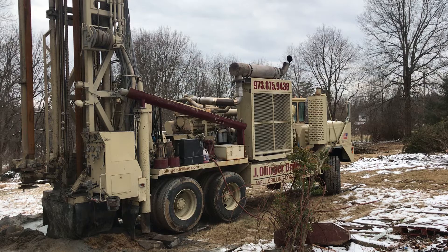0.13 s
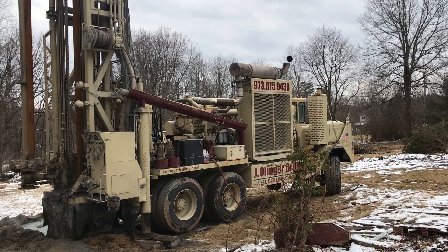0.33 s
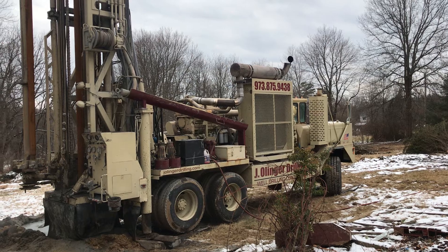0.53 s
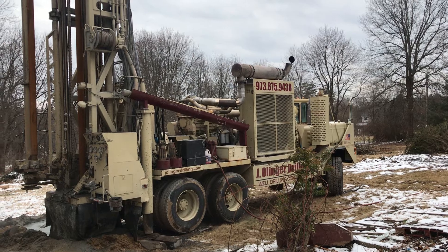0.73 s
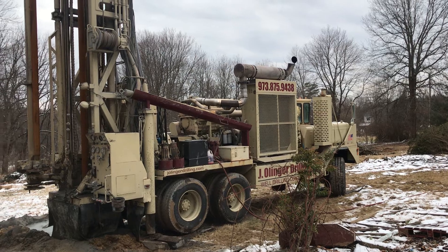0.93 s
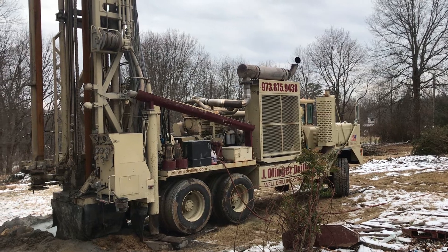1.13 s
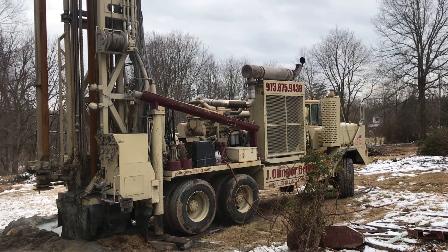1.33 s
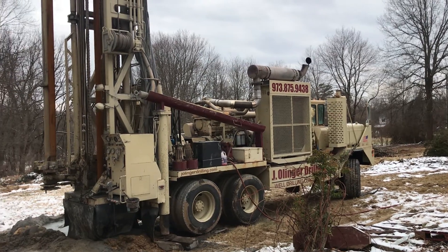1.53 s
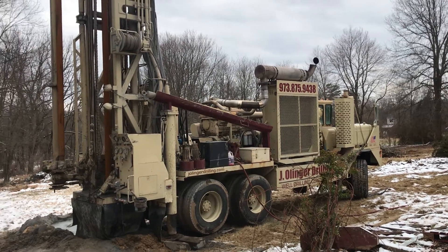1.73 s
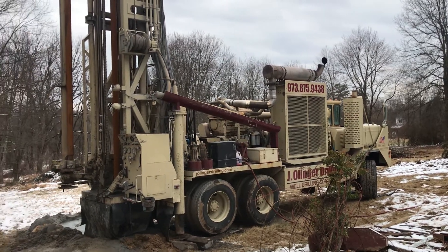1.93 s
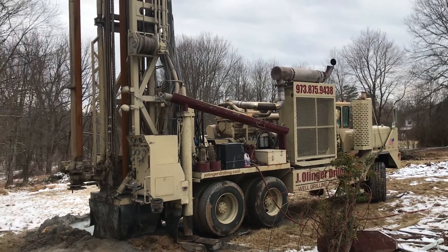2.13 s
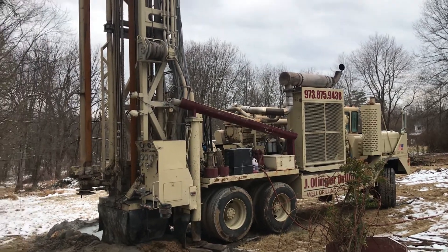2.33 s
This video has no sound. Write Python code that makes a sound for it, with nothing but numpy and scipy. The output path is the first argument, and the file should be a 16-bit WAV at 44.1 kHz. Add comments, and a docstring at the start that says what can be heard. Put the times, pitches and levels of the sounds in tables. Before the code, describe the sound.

A drill rig's loud diesel roar cuts in abruptly at 0.12 s after silence and holds nearly steady until the end at about 2.5 s. Drill steel rattles about 29 times a second, stronger around 1.2 and 1.5 s. Hard metallic knocks cluster at 0.14-0.46, 0.82-0.86, 1.5-1.78, 2.0 and 2.35 s. Grainy pipe squeals come mostly at 0.45-1.1 s, over wavering whines and constant air hiss.

```python
"""After a brief silence a diesel throbs at nearly steady speed: a truck-mounted drill rig in an open yard.
Its exhaust is a sum of harmonics of the engine cycle, joined by fan and engine roar of filtered noise.
An air hammer rattles the drill steel about 29 times a second: noise shaped by blow envelopes, with resonances.
Hard knocks are struck noise, the turning pipe squeals in short grainy tones, compressor and pumps whine
as wavering sines, and compressed air hisses as filtered noise."""
import sys
import numpy as np
from scipy import signal
from scipy.fft import rfft, irfft
from scipy.io import wavfile
from scipy.ndimage import uniform_filter1d

SR = 44100
rng = np.random.default_rng(int(sys.argv[2]) if len(sys.argv) > 2 else 0)


def file_out(sig):
    """Save sig as 16-bit WAV at sys.argv[1]."""
    # one column per channel
    cols = np.atleast_2d(sig).T
    # limit, then scale
    lim = np.clip(cols, -1, 1)
    pcm = np.round(lim * 32767).astype(np.int16)
    wavfile.write(sys.argv[1], SR, pcm)


N = 110250  # samples, 2.5 s
BODY_MODE_SPACING_HZ, BODY_RIPPLE_DB = 29.74, -0.3  # spectral ripple of the steel body
BLOW_RISE_S = 0.00088  # time constant


def undb(db):
    """Logarithmic level: decibels to amplitude gain."""
    return 10 ** (np.asarray(db) / 20)


def level(x, db):
    """Effective value: scale a signal to an rms level in dB."""
    return x * undb(db) / np.sqrt(np.mean(x ** 2))


def walk(rate):
    """Band-limited fluctuation: smoothed random steps, spread about 1, changing about rate times a second."""
    k = max(int(SR / rate), 2)
    steps = np.repeat(rng.standard_normal(N // k + 2), k)
    smooth = uniform_filter1d(uniform_filter1d(steps, k), k)
    return 1.35 * smooth[:N]  # smoothing narrows the spread


def noise(colour, ripple_db=0):
    """Spectral shaping: noise of rms 1 filtered by a colour table, rippled by many small body modes."""
    hz, db = np.array(colour, float).T
    f = np.maximum(np.fft.rfftfreq(N, 1 / SR), 1)
    modes = np.tanh(rng.standard_normal(size=2048))
    ripple = ripple_db * np.interp(f / BODY_MODE_SPACING_HZ, np.arange(len(modes)), modes)
    ripple = ripple * f / (f + 700)  # weaker in the bass
    gain = undb(np.interp(np.log(f), np.log(hz), db) + ripple)
    return level(irfft(rfft(rng.standard_normal(N)) * gain, N), 0)


def tone(hz):
    """Phase accumulation: a sine of rms 1 that follows a pitch curve."""
    cycles = np.cumsum(hz) / SR + rng.random()
    return np.sqrt(2) * np.sin(2 * np.pi * cycles)


def ring(hz, width_hz):
    """Resonance under steady random excitation: noise of rms 1 filtered to one peak."""
    f = np.fft.rfftfreq(N, 1 / SR)
    peak = 1 + ((f - hz) / (width_hz / 2)) ** 2  # width is at half amplitude
    return level(irfft(rfft(rng.standard_normal(N)) / peak, N), 0)


def strike(age, decay_s):
    """Impact response: quick rise, exponential decay."""
    age = np.maximum(age, 0)
    return (1 - np.exp(-age / BLOW_RISE_S)) * np.exp(-age / decay_s)


# colour of the compressed-air hiss: (frequency [Hz], relative level [dB per Hz])
HISS_COLOUR = [(1000, -1), (3000, 2), (4400, 1.5), (4900, -1.5), (5600, 1), (6400, 0.5), (7000, 5.5),
               (7800, -2), (8400, 0), (9500, 0.5), (10450, -8), (11000, 1), (11500, 2.5), (12200, -8.5),
               (12800, -4.5), (13500, -2), (14000, 6), (14700, -4), (16000, -15.5)]
HISS_DB = -23.5


def air(flicker_db=1.0, ripple_db=0.5):
    """Turbulent flow noise: a broadband hiss of compressed air whose level flickers slightly."""
    return level(noise(HISS_COLOUR, ripple_db) * undb(flicker_db * walk(40.3)), HISS_DB)


# speed of compressor and pumps: (time [s], speed [share of the mean])
MACHINE_SPEED = [(.12, 1.002), (.62, 1.01), (.95, 0.98), (1.31, 1), (2.04, 1.002), (2.44, 0.97)]
# whines of compressor, pumps and gears: (frequency [Hz], rms level [dB], flutter [dB])
WHINE_TONES = [(110.4, -38, -2), (443, -44, 2), (555.2, -29, 4), (644.3, -27, 4.5), (1012, -34, 0.5),
               (1108, -35, 4), (1434, -34, 0.5), (1955, -35, -1), (2280, -33.5, 3), (2670, -45, 10),
               (2695, -32.5, 7), (3796, -41.5, 14), (4460, -38.5, 7), (5400, -41.5, 5), (5573, -44, 4),
               (6013, -41.5, 16), (6780, -40, 7), (6760, -42, 14), (8280, -41, -0.5)]
WHINE_WANDER, WHINE_JITTER = .0005, .001  # relative: shared by all tones, separate for each
WHINE_WAVER_HZ = 2.04


def machinery(t):
    """Frequency and amplitude modulation: whines share a speed drift, and waver and flutter singly."""
    drift = np.interp(t, *np.array(MACHINE_SPEED).T) + WHINE_WANDER * walk(5)
    total = 0
    for hz, db, flutter_db in WHINE_TONES:
        pitch = hz * (drift + WHINE_JITTER * walk(90)) + WHINE_WAVER_HZ * walk(59.91)
        flutter = undb(flutter_db * np.tanh(walk(40.1)))
        total = total + level(tone(pitch) * flutter, db)
    return total


# squeals and groans of the pipe: (middle [s], length [s], frequency [Hz], level before swelling [dB])
PIPE_SQUEALS = [(.466, .026, 1450, -19), (.48, 0.075, 2272, -23), (0.51, .06, 6830, -26),
                (0.525, 0.17, 5590, -31.5), (0.524, 0.14, 2695, -25), (0.705, 0.046, 6750, -23.5),
                (.76, .08, 6860, -29), (0.738, 0.14, 2695, -24.5), (.82, 0.26, 8180, -36),
                (0.94, 0.088, 6810, -27.5), (0.969, 0.044, 2697, -20), (1.105, 0.066, 6825, -26),
                (1.51, 0.11, 1472, -24), (1.64, 0.15, 5590, -30), (1.92, .06, 5572, -35),
                (2.08, .11, 5600, -29), (2.242, 0.045, 5570, -30), (2.241, .09, 8255, -36),
                (2.417, .06, 5570, -30), (2.44, 0.036, 6830, -32)]
SQUEAL_WIDTH_HZ, SQUEAL_GRAIN, SQUEAL_ROUGH = 240, 0.55, 0.00303  # grain: amplitude; rough: relative pitch


def squeals(t):
    """Frictional vibration: the pipe rubs in its guide in short grainy tones that swell and fade."""
    total = 0
    for middle, length, hz, db in PIPE_SQUEALS:
        rough_tone = tone(hz * (1 + SQUEAL_ROUGH * walk(400)))
        voice = rough_tone + SQUEAL_GRAIN * ring(hz, SQUEAL_WIDTH_HZ)
        swell = np.exp(-2 * ((t - middle) / length) ** 2)
        total = total + swell * level(voice, db)
    return total


# colour of the clank: (frequency [Hz], relative level [dB per Hz])
CLANK_COLOUR = [(300, -10), (700, -20), (1100, 1), (1450, -3), (2200, -3.5), (3200, -7), (9000, -32)]
# colour of the bright crack: (frequency [Hz], relative level [dB per Hz])
CRACK_COLOUR = [(800, -41), (2000, -5), (3200, 3.5), (4400, 2), (7000, -2.5), (15000, -16)]
# hard knocks, before a common lift:
# (time [s], clank level [dB], crack level [dB], decay time constant [s])
HARD_KNOCKS = [(0.142, -37, -19, 0.0089), (0.208, -19, -19.5, 0.0067), (.3075, -18, -30, 0.0099),
               (.408, -37, -19, 0.0087), (.451, -26, -19, 0.0081), (.459, -14.5, -36, 0.021),
               (.8215, -23, -20, 0.011), (.856, -20, -19.5, 0.017), (1.1628, -16.5, -26, .01),
               (1.504, -24, -24, 0.009), (1.575, -26, -17.5, .008), (1.745, -13.5, -29, .01),
               (1.776, -21, -20, 0.0069), (1.998, -14, -28, .008), (2.014, -27, -22, 0.0072),
               (2.048, -16, -31, 0.0065), (2.353, -19, -24, 0.0073), (2.387, -16, -24, 0.0088)]
KNOCK_LIFT_DB = 2.5


def knocks(t):
    """Impact excitation: each hard blow is a decaying clank with a bright crack on top."""
    clank, crack = noise(CLANK_COLOUR), noise(CRACK_COLOUR)
    total = 0
    for s, clank_db, crack_db, decay_s in HARD_KNOCKS:
        colour = undb(clank_db) * clank + undb(crack_db) * crack
        total = total + strike(t - s, decay_s) * colour
    return total * undb(KNOCK_LIFT_DB)


# colour of the rattling drill steel: (frequency [Hz], relative level [dB per Hz])
STEEL_COLOUR = [(25, -40), (200, -9), (500, -3.5), (680, 5), (850, -2), (1100, 4.5), (1500, -3.5),
                (2100, -7.5), (2800, -3), (4200, -11), (6500, -13.5), (9000, -18), (15000, -28)]
# resonances of the drill steel: (frequency [Hz], width [Hz], rms level [dB])
STEEL_RINGS = [(617, 25, -38), (697, 74, -33), (1066, 40, -40), (1175, 36, -40), (1295, 41, -33.5),
               (1408, 77, -39.5), (2504, 34, -35), (2810, 31, -37.5), (2873, 62, -39.5), (3034, 40, -46),
               (3170, 14, -43.5), (3356, 40, -37), (3570, 20, -50), (4280, 19, -48), (5044, 15, -55),
               (5000, 15, -54), (7080, 77, -50), (12030, 60, -43)]
# course of the hammer rattle: (time [s], gain [dB])
RATTLE_COURSE = [(.12, -6), (.3, 1), (.5, 0), (.65, -2.5), (.95, -2), (1.2, 3), (1.35, 0), (1.5, 3),
                 (1.65, -1), (2.02, 0.5), (2.2, 1), (2.5, -2.5)]
HAMMER_HZ, FIRST_BLOW_S, BLOW_DECAY_S = 29.44, .1065, 0.024
BLOW_SCATTER_DB, BLOW_JITTER_S = 2.5, 0.0017
HAMMER_DB = -22  # rms of the rattle before its course


def hammer(t):
    """Periodic impacts: uneven blows gate the rattle of the drill steel over its steady resonances."""
    times = np.arange(FIRST_BLOW_S, t[-1], 1 / HAMMER_HZ)
    rattle = noise(STEEL_COLOUR, BODY_RIPPLE_DB)
    ringing = sum(undb(db) * ring(hz, width_hz) for hz, width_hz, db in STEEL_RINGS)
    chance = rng.standard_normal((len(times), 2))
    power = 0  # overlapping blows add in power
    for s, (size, late) in zip(times, chance):
        strength = undb(BLOW_SCATTER_DB * np.tanh(size))
        blow = strength * strike(t - s - BLOW_JITTER_S * late, BLOW_DECAY_S)
        power = power + blow ** 2
    course = undb(np.interp(t, *np.array(RATTLE_COURSE).T))
    return level(rattle * np.sqrt(power), HAMMER_DB) * course + ringing


# uneven firings in one engine cycle: (position [share of the cycle], strength [dB])
FIRING_PULSES = [(0, -1.5), (0.158, -9.5), (0.319, -2), (0.491, -12), (0.643, -6), (.88, -0.5)]
# exhaust harmonics: (order [multiple of the cycle rate], relative level [dB])
EXHAUST_ORDERS = [(2, -42), (4, -17), (6, -17.5), (8, -17), (9, 1), (10, -3), (11, -15), (12, -2),
                  (13, -8.5), (14, -5.5), (16, -6), (17, -16.5), (18, -3), (19, -10), (20, -6.5),
                  (21, -12.5), (26, -13.5), (28, -15.5), (36, -10), (41, -8), (42, -4.5), (43, -20.5)]
# roar of the cooling fan and engine block: (frequency [Hz], relative level [dB per Hz])
ROAR_COLOUR = [(20, -38), (35, -18), (70, -11.5), (130, -5), (300, -1.5), (400, -7.5), (510, -6),
               (600, -1.5), (710, -1), (820, -5), (1080, -0.5), (1450, -2.5), (1750, -6), (2150, -10.5),
               (2750, -8), (3500, -17.5), (5000, -19), (15000, -46)]
CYCLE_HZ, SPEED_WOBBLE, CYCLE_START_S = 16.9, .0012, .047  # four-stroke cycle; relative wander; offset
EXHAUST_DB, EXHAUST_ROUGH_DB, THROB_SCATTER_DB = -20.5, 1.3, 1
ROAR_DB, FIRING_DEPTH = -19.5, 0.12


def diesel(t):
    """Fourier synthesis: firings set the phases of the exhaust orders; the roar pulses at the firing rate."""
    speed = CYCLE_HZ * (1 + SPEED_WOBBLE * walk(4.1))
    cycles = np.cumsum(speed) / SR - CYCLE_HZ * CYCLE_START_S
    exhaust = 0
    for k, db in EXHAUST_ORDERS:
        pulses = sum(undb(size_db) * np.exp(-2j * np.pi * k * share) for share, size_db in FIRING_PULSES)
        amplitude = undb(db + EXHAUST_ROUGH_DB * walk(14))
        exhaust = exhaust + amplitude * np.cos(2 * np.pi * k * cycles + np.angle(pulses))
    throb = level(exhaust * undb(THROB_SCATTER_DB * walk(60)), EXHAUST_DB)
    firing = np.cos(2 * np.pi * len(FIRING_PULSES) * cycles)
    roar = level(noise(ROAR_COLOUR, BODY_RIPPLE_DB) * (1 + FIRING_DEPTH * firing), ROAR_DB)
    return throb + roar


def scene():
    """Superposition: all sources add at one point, alike in both ears."""
    t = np.arange(N) / SR
    rig = air() + machinery(t) + squeals(t) + knocks(t) + hammer(t) + diesel(t)
    return np.array([rig, rig])


START_S, TOP_HZ = .1195, 15000  # abrupt onset; upper band edge


def record(dry):
    """Gating, clipping and band limitation: abrupt onset, capped peaks, no top treble."""
    running = np.arange(N) / SR >= START_S
    capped = np.clip(dry * running, -.92, .92)
    lowpass = signal.ellip(12, .2, 90, TOP_HZ, fs=SR, output="sos")
    return signal.sosfilt(lowpass, capped)


dry = scene()
out = record(dry)
file_out(out)
```